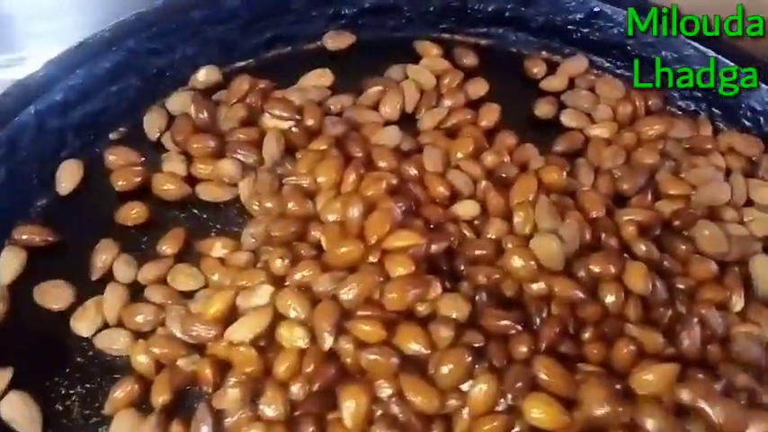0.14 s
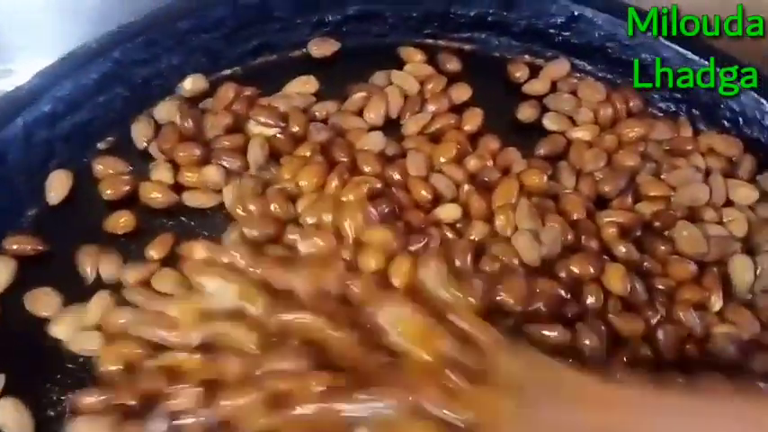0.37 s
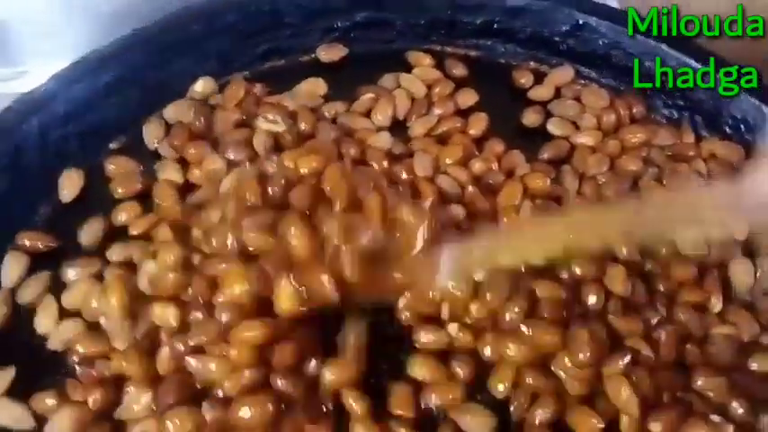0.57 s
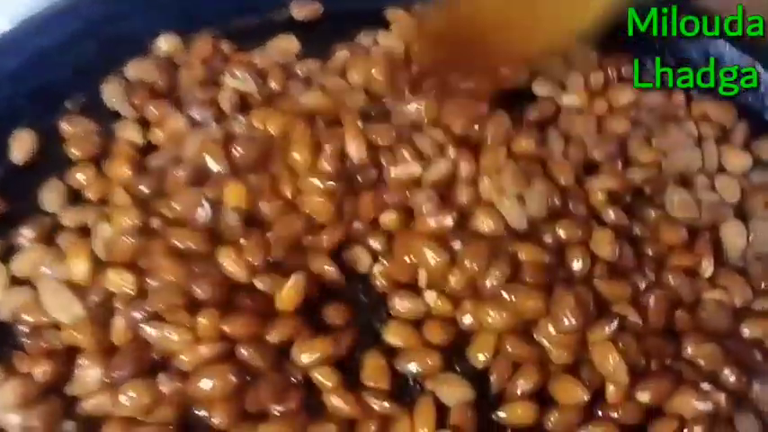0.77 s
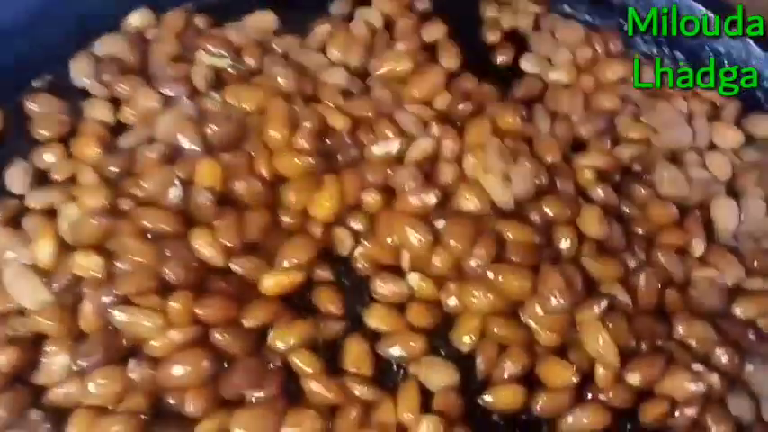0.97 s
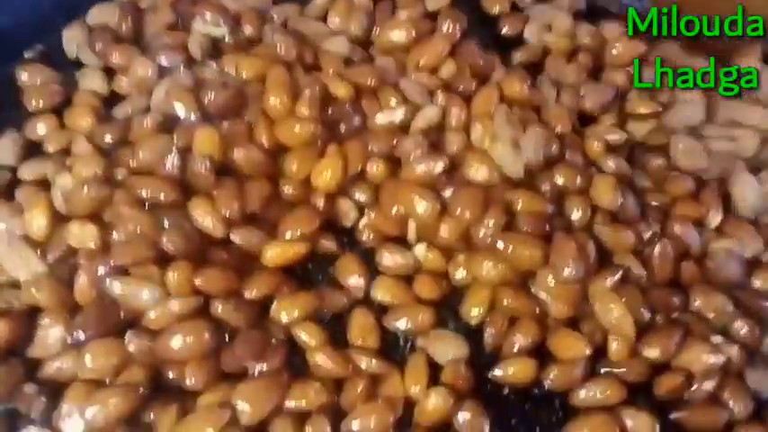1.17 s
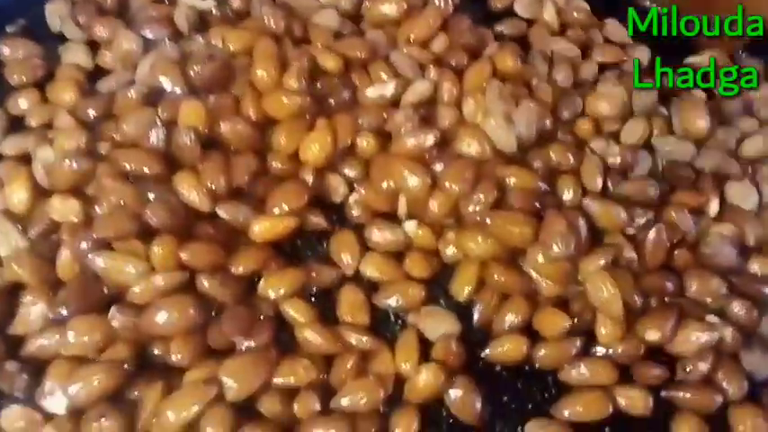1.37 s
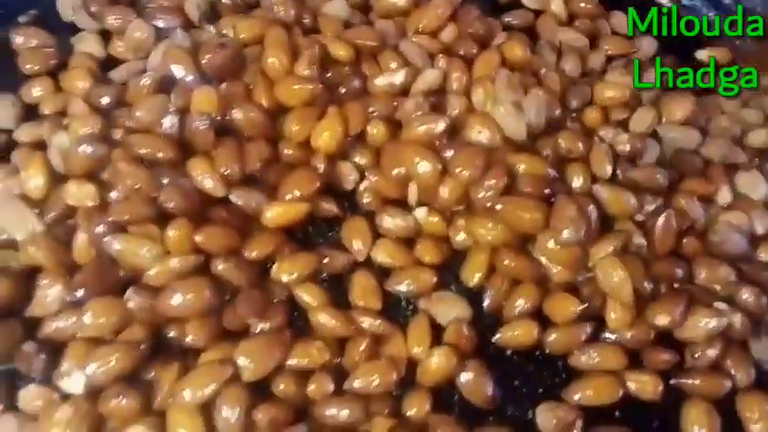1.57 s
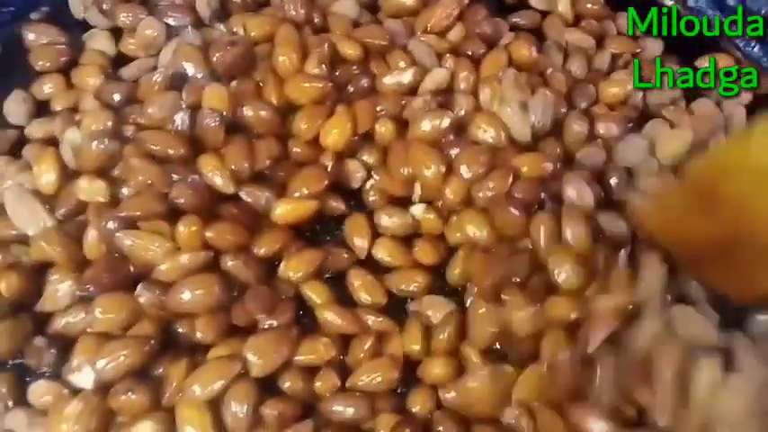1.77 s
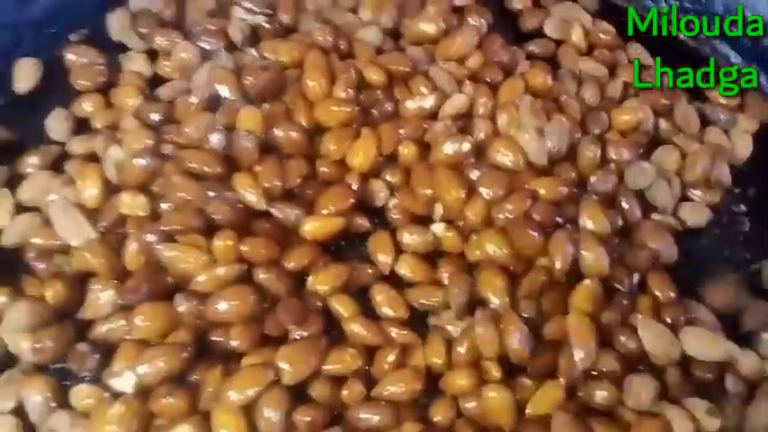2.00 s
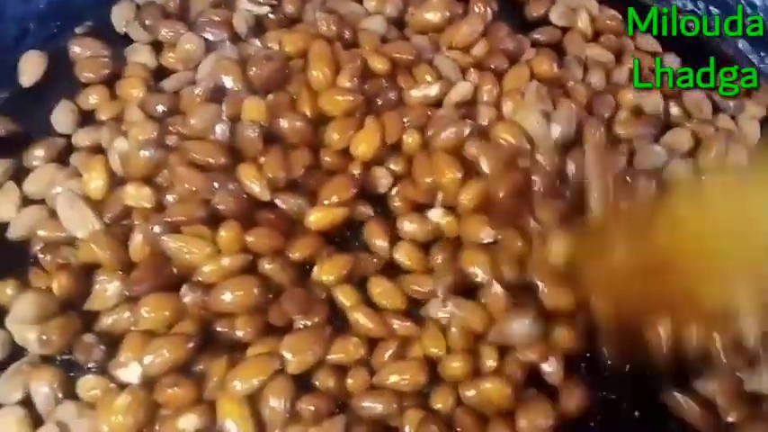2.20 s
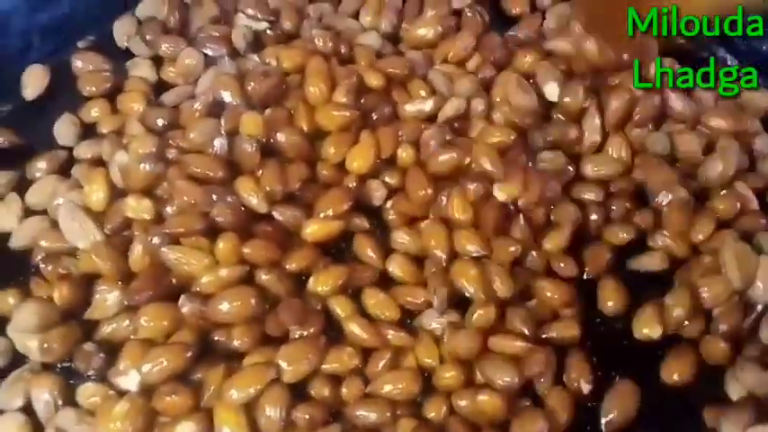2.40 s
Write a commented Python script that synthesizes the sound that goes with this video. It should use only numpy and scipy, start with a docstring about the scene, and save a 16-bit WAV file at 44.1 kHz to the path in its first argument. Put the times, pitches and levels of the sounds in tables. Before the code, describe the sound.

Almonds rattle and clatter in a heavy frying pan as a wooden spatula stirs and knocks

```python
"""Almonds patter in a heavy frying pan while a wooden spatula knocks it, oil hisses, spits and
crackles, and the pan rocks on the stove, close to a phone.
Knocks and nuts strike short-lived ringing tones; cracks, clicks, wooden clacks and oil pops are
fading puffs of filtered noise; rocking and hiss are noise shaped in pitch and loudness.
A short noise tail adds the room."""
import sys
import numpy as np
from scipy import signal
from scipy.fft import rfft, irfft, next_fast_len
from scipy.io import wavfile
from scipy.ndimage import uniform_filter1d

SR = 44100
rng = np.random.default_rng(int(sys.argv[2]) if len(sys.argv) > 2 else 0)


def pcm_store(signal):
    """Save signal as 16-bit PCM."""
    levels = np.round(np.clip(np.atleast_2d(signal), -1, 1) * 32767)
    wavfile.write(sys.argv[1], SR, levels.astype(np.int16).T)


def gain_from_db(level_db):
    """Convert decibel levels to linear amplitude factors (20 dB per decade)."""
    decades = np.asarray(level_db, float) / 20
    return 10 ** decades


N = 108045  # length in samples, 2.45 s


def set_level(x, db):
    """Scale a sound so its average (rms) level is db."""
    return x * gain_from_db(db) / np.sqrt(np.mean(x ** 2))


def curve(table, column):
    """Draw straight lines between the table's points, one value per sample."""
    points = np.array(table, float)
    return np.interp(np.arange(N) / SR, points[:, 0], points[:, column])


def colour(x, points):
    """Make some pitches louder than others, by (frequency [Hz], gain [dB]) points on a log axis."""
    table = np.array(points, float)
    size = next_fast_len(N + SR // 10)
    hz = np.maximum(np.arange(size // 2 + 1) * SR / size, 1)
    gain = gain_from_db(np.interp(np.log(hz), np.log(table[:, 0]), table[:, 1]))
    return irfft(rfft(x, size) * gain, size)[:N]


def band(x, hz, width_hz):
    """Keep the sound around one frequency, with gain 1 at the centre."""
    return signal.lfilter(*signal.iirpeak(hz, hz / width_hz, fs=SR), x)


def train(times, sizes):
    """Put a one-sample impulse of the given size at each time."""
    return np.bincount(np.clip((times * SR).astype(int), 0, N - 1), sizes, N)


def burst(x, t60):
    """Turn every impulse into a puff of noise that fades by 60 dB in t60 seconds."""
    fading = signal.lfilter([1], [1, -1000 ** (-1 / (t60 * SR))], x)
    return fading * rng.standard_normal(N)


def scatter(per_s, spread_db):
    """Pick random times with mostly small, sometimes large sizes."""
    u = rng.random((int(per_s * N / SR), 2))
    times = u[:, 0] * N / SR
    return times, gain_from_db(-spread_db * np.log(1 - u[:, 1]))


def ring(x, hz, t60):
    """Let every impulse start one pure tone that fades by 60 dB in t60 seconds."""
    pole = np.exp(2j * np.pi * hz / SR - np.log(1000) / (t60 * SR))
    return signal.lfilter([1], [1, -pole], x).imag


def bump(hz, centre_hz, width_oct):
    """Smooth hill, 1 at the centre, that falls off over width_oct octaves."""
    return np.exp(-(np.log2(hz / centre_hz) / width_oct) ** 2)


# The ringing tones (modes) of the pan under its load of nuts:
# (frequency [Hz], relative level [dB], time to fade by 60 dB [s])
PAN_MODES = [(243, -19.5, 0.55), (359, -14, 0.058), (439, -11, 0.049), (495, -7.5, 0.056),
             (537.3, -3.5, 0.069), (603.3, -5.5, 0.093), (640.3, -2.5, 0.063), (700, -13, 0.013),
             (808, -11, 0.05), (883, -13.5, 0.082), (945.4, -4, 0.13), (1050, -5, 0.11),
             (1096.2, -0.5, 0.095), (1147, -7.5, 0.068), (1236, -2.5, 0.053), (1360, -2.5, 0.05),
             (1447, -3, 0.063), (1560, 1, 0.038), (1632.5, -7.5, 0.072), (1760, -13.5, 0.097),
             (1920, -6.5, 0.042), (2064.3, -7.5, 0.042), (2160, -7, 0.089), (2445, -6, 0.026),
             (2783, -11, 0.066), (3280, -16.5, 0.031), (3550, -17.5, 0.062), (4305, -13.5, 0.07),
             (5300, -18.5, 0.049), (6520, -11.5, 0.047)]
LOW_MODES_HZ = 900  # tones below this count as low modes
# The stirring stroke:
# (time [s], patter level [dB], relative low-mode level [dB], relative nut-click level [dB])
STIR_STROKE = [(0, -41.5, -9, -10), (.05, -71.5, -4, 17.5), (.165, -67, -2, 4), (.185, -29, -12.5, -11.5),
               (.245, -36, -5, -4), (.265, -24.5, -4.5, -15), (.33, -30.5, 2.5, -3), (.42, -37, 4.5, -5),
               (.51, -39.5, 3, -13), (.54, -30, -0.5, -17), (.6, -34.5, -4, -28), (.66, -46, 5.5, -18),
               (.78, -42.5, -5, -4), (.84, -35.5, -4.5, -17), (.9, -34.5, -7.5, -13), (.94, -46, -1.5, -26),
               (1.06, -39, -12, -16), (1.14, -47, -3, 7), (1.21, -43.5, -21.5, 0.5), (1.27, -37.5, -8, -3),
               (1.32, -44.5, -0.5, -12), (1.36, -61, -7, -4), (1.39, -36.5, -17, -32),
               (1.45, -49.5, -24, -27), (1.49, -65.5, 0, 5), (1.55, -46, -11, 1), (1.63, -35.5, -9.5, -3.5),
               (1.7, -37, -7, -10), (1.78, -38, 0.5, -12), (1.87, -41, -3, -31), (1.95, -47, 2.5, -27),
               (2.05, -46, -15.5, -13), (2.15, -48.5, 2.5, -3), (2.2, -38, 2.5, -17), (2.29, -35.5, -2, 0),
               (2.35, -38.5, -3, -17), (2.45, -38.5, 0, -7)]


def patter():
    """Nuts tumble on the pan floor, each ringing it at its own spot, and click against each other."""
    per_s, size_spread_db, size_max_db = 450, 4, 11
    spot_db, spot_oct = 9, .4  # how strongly and how widely a spot favours nearby tones
    times, sizes = scatter(per_s, size_spread_db)
    strengths = rng.standard_normal((len(times), len(PAN_MODES)))
    sizes = np.minimum(sizes, gain_from_db(size_max_db))
    spot_hz = 500 * 2 ** (2.4 * rng.random(len(times)))
    force = gain_from_db(curve(STIR_STROKE, 1))
    low_gain = gain_from_db(curve(STIR_STROKE, 2) + 10)
    ringing, power = 0, 0
    for m, (hz, mode_db, t60) in enumerate(PAN_MODES):
        spot = gain_from_db(spot_db * bump(hz, spot_hz, spot_oct))
        hits = train(times, sizes * strengths[:, m] * spot) * gain_from_db(mode_db)
        power += np.mean(hits ** 2) * t60 * SR / 28  # estimated power of this tone's ringing
        ringing = ringing + ring(hits * force * (low_gain if hz < LOW_MODES_HZ else 1), hz, t60)
    clicks = set_level(band(burst(train(times, sizes), 0.027), 6200, 3900), -2)
    clicks = clicks * force * gain_from_db(curve(STIR_STROKE, 3))
    return ringing * gain_from_db(0.5) / np.sqrt(power) + clicks


# The pan shifts on the stove grate: (time [s], rocking level [dB], relative hum level [dB])
ROCKING = [(0.0, -58, -73), (0.16, -82, -75.5), (0.2, -47, -46), (0.22, -41.5, -42.5), (0.31, -56, -43),
           (0.43, -48.5, -50.5), (0.48, -64, -55), (0.79, -92, -76), (0.82, -89, -65), (1.01, -82, -52.5),
           (1.13, -48.5, -40.5), (1.39, -54.5, -66.5), (1.42, -83, -85), (1.49, -80, -59.5),
           (1.55, -60, -49), (1.61, -43.5, -39.5), (1.77, -56, -49.5), (1.82, -89, -47.5),
           (2.06, -100, -65), (2.11, -42, -52.5), (2.17, -45, -47), (2.28, -47.5, -52), (2.32, -98, -52.5),
           (2.45, -52, -72)]


def rocking():
    """Low thumps and hum of pan and grate: narrow bands of noise that swell and fade."""
    thump_noise, hum_noise = rng.standard_normal((2, N))
    thump = set_level(band(band(thump_noise, 93, 17), 93, 120), 0)
    wide_hum = set_level(band(band(hum_noise, 239, 174), 239, 310), -4)
    narrow_hum = set_level(band(hum_noise, 245.8, 15.3), -7)
    hum = wide_hum + narrow_hum
    return thump * gain_from_db(curve(ROCKING, 1)) + hum * gain_from_db(curve(ROCKING, 2))


# Tone colour of the oil's hiss: (frequency [Hz], relative level per hertz [dB])
HISS_COLOUR = [(35, -11), (60, -23), (87, 9.5), (110, -41), (386, -18), (1000, -20.5), (1130, -1.5),
               (2060, -37.5), (3060, -8.5), (3860, -8), (6440, -3.5), (10000, -42), (15600, -19)]


def oil_hiss():
    """A little oil hisses: coloured noise whose loudness flutters slightly."""
    flutter = set_level(uniform_filter1d(rng.standard_normal(N), size=900), 0)  # about 20 ms smoothing
    hiss = colour(rng.standard_normal(N), HISS_COLOUR) * gain_from_db(1.2 * flutter)
    return set_level(hiss, -57.5)


# How lively the oil crackles as the nuts turn over: (time [s], relative level [dB])
CRACKLE_LEVEL = [(0, -76), (.17, -82), (.2, -76), (.33, -61), (.42, -63), (.5, -81), (.62, -81), (.68, -70),
                 (.9, -76), (1.05, -75), (1.15, -76), (1.3, -75), (1.36, -69.5), (1.5, -71), (1.62, -64.5),
                 (1.75, -53), (1.8, -70), (1.95, -78), (2.15, -71), (2.2, -58), (2.3, -74), (2.45, -74)]


def oil_crackle():
    """Fine crackle of oil: many tiny high-pitched puffs of noise at random times."""
    pops = burst(train(*scatter(350, 2.8)), 0.016)  # 350 pops per second
    fine = set_level(band(pops, 14000, 4000) + 0.8 * band(pops, 10300, 3300), 0)
    return fine * gain_from_db(curve(CRACKLE_LEVEL, 1) + 20)


# Single spits of oil:
# (time [s], relative level [dB], strength of the lower part against the top [dB])
OIL_SPITS = [(0.0393, -42, -5), (0.1765, -59, -6), (0.2527, -36, 3), (0.3185, -39, -1), (0.3416, -37, -8),
             (0.6404, -67, 0), (0.6554, -47, 3), (0.779, -33, -15), (0.816, -43, -4), (0.849, -49, -6),
             (0.855, -38.5, -7), (0.9203, -60, -6), (0.9507, -28.5, -6), (1.018, -36, -16),
             (1.062, -63, -14), (1.075, -43, 5), (1.1368, -49, 8), (1.1593, -29.5, -25), (1.252, -53, -8),
             (1.2705, -38, -3), (1.3053, -39, 0.5), (1.4157, -40, 1), (1.4656, -45, -6), (1.5229, -57, -4),
             (1.5358, -46, 7), (1.6107, -41, 1), (1.6482, -35, -6), (1.7066, -37, 0), (1.731, -42, 1),
             (1.8326, -41.5, -5), (1.925, -54, 4), (2.0243, -59, -4), (2.1793, -32, -25), (2.214, -46, -7),
             (2.359, -50.5, 11), (2.4349, -48, 3)]


def spits():
    """Oil spits: bright puffs of noise in a top band, with a lower band of their own strength."""
    t60, gain_db = 0.013, 2.5
    times, db, reach_db = np.array(OIL_SPITS, float).T
    top = burst(train(times, gain_from_db(db + gain_db)), t60)
    top = band(band(top, 13200, 3300), 14400, 5400)
    lower = burst(train(times, gain_from_db(db + reach_db + gain_db)), t60)
    lower = band(band(lower, 12100, 6000), 9200, 7500)
    return gain_from_db(15.5) * (top + lower)


# The loudest knocks: (time [s], relative level [dB], favoured ring [Hz],
# relative low-mode level [dB], relative crack level [dB])
SPATULA_KNOCKS = [(0.179, -26.5, 1130, -21, 1.5), (0.211, -11, 2160, -22, -5.5),
                  (0.254, -1.5, 1104, -5, -10), (0.267, -17, 1120, -19, -15), (0.29, -18, 2200, -15, -5),
                  (0.311, -12.5, 554, -10.5, -21), (0.324, -15, 1080, -9.5, -25),
                  (0.344, -23.5, 600, 0, -19), (0.371, -17.5, 640, -8.5, -12), (0.397, -19, 645, -10, -16),
                  (0.434, -23.5, 1160, -4, -25), (0.496, -27, 566, 0, -22), (0.521, -14, 1760, -16, -4.5),
                  (0.549, -19.5, 528, -10, -26), (0.577, -20.5, 1360, -6, -26), (0.681, -37, 590, -9, -17),
                  (0.706, -22.5, 630, -13, -25), (0.751, -30.5, 1080, -1, 4.5),
                  (0.8, -15.5, 560, -7.5, -32), (0.859, -10.5, 1650, -24, -12), (0.88, -9, 1560, -47, -36),
                  (0.916, -25, 1560, -8, -16), (0.95, -20.5, 1660, -12.5, -4), (0.976, -20, 1610, -11, 1),
                  (1.003, -23.5, 1130, -34, -29), (1.036, -23.5, 1560, -35, -30),
                  (1.071, -22, 1620, -5, -2.5), (1.085, -20.5, 910, -22, 1.5), (1.123, -24, 1630, -16, -9),
                  (1.137, -30, 930, -18, -3), (1.182, -38, 1120, -16, -5), (1.196, -26.5, 1200, -7.5, -18),
                  (1.224, -17.5, 2160, -14, 4), (1.239, -24.5, 1460, -10, -21), (1.259, -27, 960, -15, -14),
                  (1.284, -32, 635, -9, -15), (1.372, -26.5, 2160, -16, -24), (1.41, -27, 2160, -29, -18),
                  (1.439, -32, 2160, -31, -15), (1.512, -33.5, 1460, -6, -24), (1.537, -24, 1500, -13.5, 6),
                  (1.599, -20.5, 2060, -24, -23), (1.629, -19, 1540, -15, -6),
                  (1.651, -24.5, 2150, -20, -11), (1.674, -31, 1590, -15, -27), (1.71, -25, 942, -8, -17),
                  (1.758, -23.5, 950, -6.5, -17), (1.796, -27.5, 939, -10, -24),
                  (1.819, -31, 619, -3.5, -20), (1.847, -24, 1560, -30, -31), (1.896, -31, 1040, -2, -25),
                  (1.963, -24, 2100, -11, -21), (2.012, -16, 1730, -15.5, -27),
                  (2.078, -25.5, 1730, -28, -27), (2.104, -28, 1690, -23, -24), (2.165, -24, 600, -22, 1),
                  (2.178, -16.5, 1050, -7.5, 10), (2.211, -25.5, 1100, -1, -20), (2.227, -34, 570, -9, -12),
                  (2.248, -25, 1490, -2, -14), (2.274, -22, 583, -9.5, -7), (2.292, -19.5, 1160, -7, 0),
                  (2.317, -24.5, 654, -17, -23), (2.349, -30.5, 1560, -5, -18),
                  (2.382, -20, 1620, -8.5, -26), (2.406, -23.5, 1560, -18, 2.5)]


def knocks():
    """Each knock lands on its own spot, so it favours some of the pan's tones, and it also cracks."""
    taps, contact_s, later_taps_db = 4, 0.00399, -6  # a few contacts in quick succession
    knock_db, spread_db = -19, 2.5
    ring_db, ring_width_oct = 9.5, 0.16  # boost around the favoured ring
    s, db, favoured_hz, low_db, crack_db = np.array(SPATULA_KNOCKS, float).T
    delays = contact_s * rng.random((len(s), taps))
    variation = rng.standard_normal((len(s), len(PAN_MODES), taps))
    later = np.arange(taps) > 0
    times = s[:, None] + delays * later
    ringing = 0
    for m, (hz, mode_db, t60) in enumerate(PAN_MODES):
        spot_db = ring_db * bump(hz, favoured_hz, ring_width_oct)
        spot_db = spot_db + (low_db + 13.5) * (hz < LOW_MODES_HZ) + (crack_db + 4) * (hz > 3000)
        mode_level = (db + knock_db + mode_db + spot_db)[:, None]
        sizes = gain_from_db(mode_level + spread_db * variation[:, m]) * gain_from_db(later_taps_db * later)
        signs = np.sign(np.sin(20 * variation[:, m]))  # scrambles which way each contact pushes
        ringing = ringing + ring(train(times.ravel(), (sizes * signs).ravel()), hz, t60)
    crack = burst(train(s, gain_from_db(db + crack_db + 1)), 0.0096)
    return ringing + band(band(crack, 4640, 2160), 4640, 4900)


def clacks():
    """The dry wooden part of each knock: a few milliseconds of noise around the favoured ring."""
    hold_s, t60, width_hz = .009, .018, 450  # the noise holds this long before fading at full scale; quieter knocks hold it for less
    t = np.arange(int(.06 * SR)) / SR
    out = np.zeros(N + len(t))
    noises = rng.standard_normal((len(SPATULA_KNOCKS), len(t)))
    for (s, db, hz, low_db, _), noise in zip(SPATULA_KNOCKS, noises):
        puff = noise * 1000 ** (-np.maximum(t - hold_s * gain_from_db(db), 0) / t60)
        clack = band(puff, hz, width_hz)
        clack = clack + gain_from_db(low_db + 3.5) * band(puff, 610, 250)
        clack = clack + gain_from_db(-17.5) * band(puff, 2060, 1130)
        start = int(s * SR)
        out[start:start + len(t)] += clack * gain_from_db(db - 6.5) / np.abs(clack).max()
    return out[:N]


def room(near):
    """The room's echo: the near sounds smeared by a noise tail that fades by 60 dB in 0.2 s."""
    t = np.arange(int(.4 * SR)) / SR
    tail = rng.standard_normal(len(t)) * 1000 ** (-t / .2) * (t > .003)  # starts after 3 ms
    tail = set_level(tail, -13) / np.sqrt(len(t))
    return signal.fftconvolve(near, tail)[:N]


# How the microphone colours the near sounds and the room: (frequency [Hz], gain [dB])
MIC_RESPONSE = [(40, -58), (200, -26.5), (400, -9), (3000, 2), (6800, -8.5), (8000, -21), (10500, -22.5),
                (13000, -29.5), (15000, -18), (15500, -7), (16000, -52)]


def microphone(x):
    """The microphone passes some pitches more strongly than others."""
    return colour(x, MIC_RESPONSE)


def scene():
    """Mix everything; the rocking and the hiss skip the room and the microphone colour."""
    near = patter() + oil_crackle() + spits() + knocks() + clacks()
    return (microphone(near + room(near)) + rocking() + oil_hiss())[None]


def low_pass(x):
    """Removes everything above the highest recorded frequency."""
    return signal.sosfilt(signal.butter(12, 16630, fs=SR, output="sos"), x)


def record(dry):
    """The phone gently rounds the loudest peaks so that they stay below a ceiling."""
    ceiling = .98
    mix = ceiling * np.tanh(dry / ceiling)
    return low_pass(mix)


dry = scene()
out = record(dry)
pcm_store(out)
```